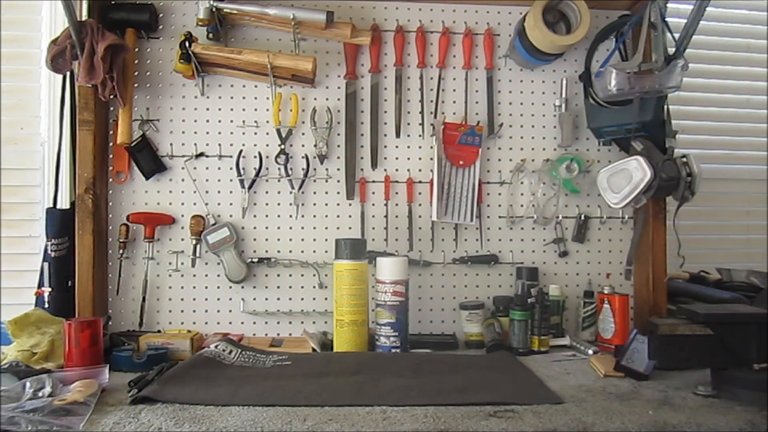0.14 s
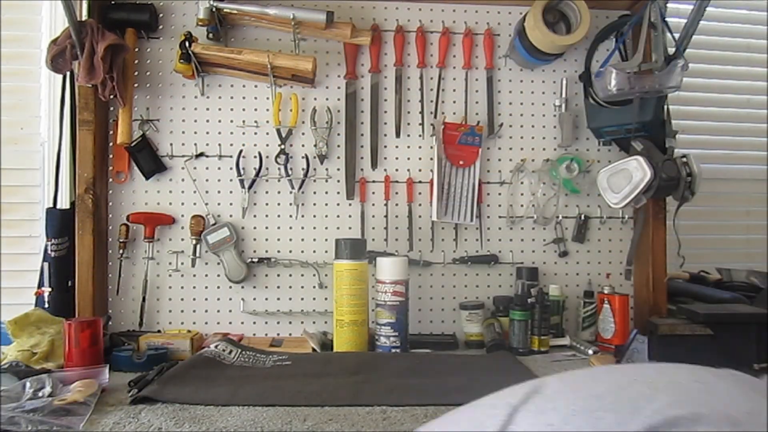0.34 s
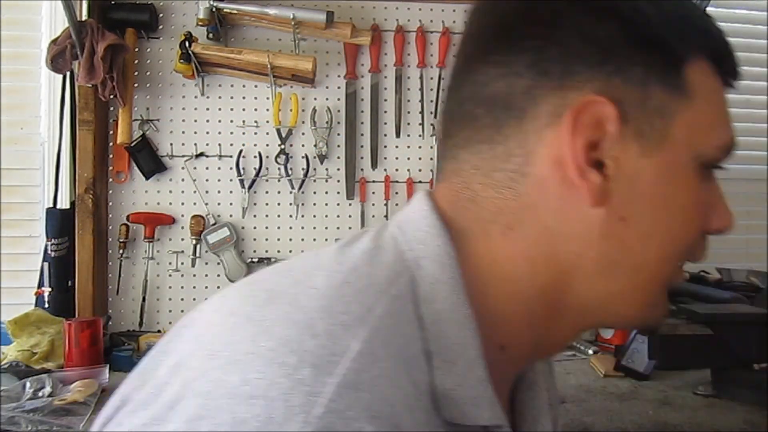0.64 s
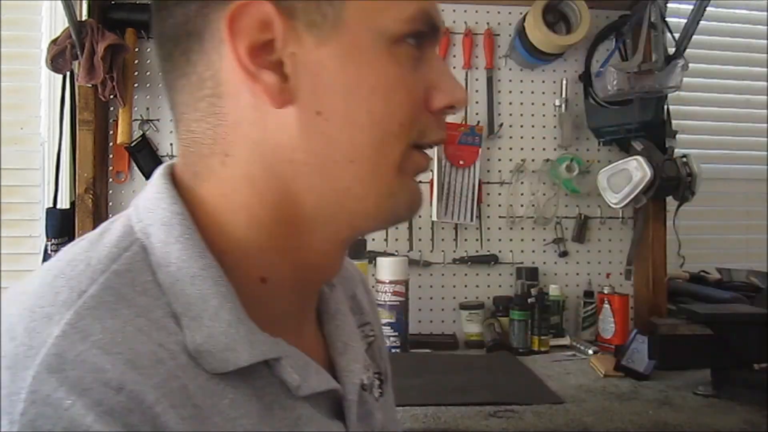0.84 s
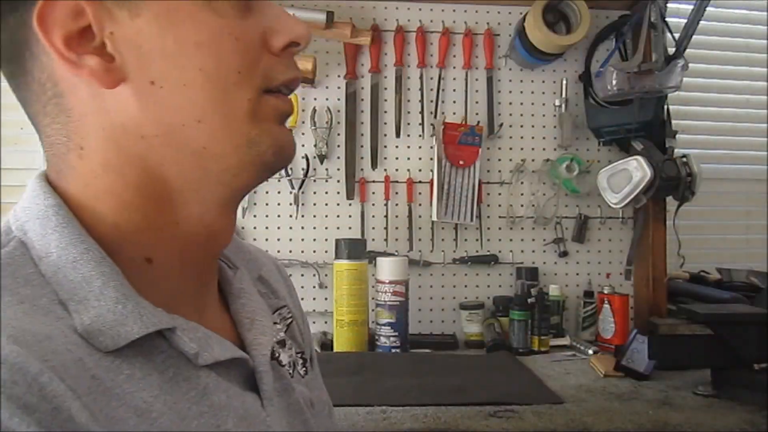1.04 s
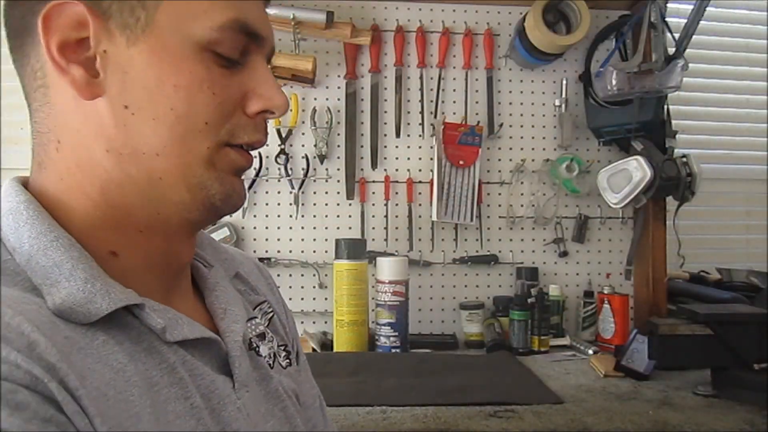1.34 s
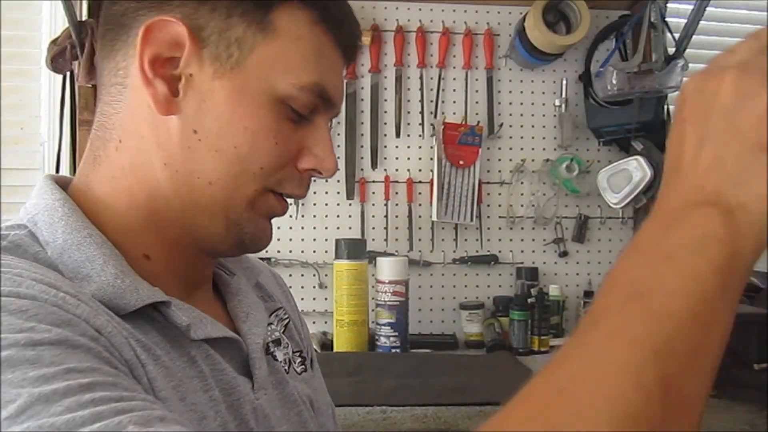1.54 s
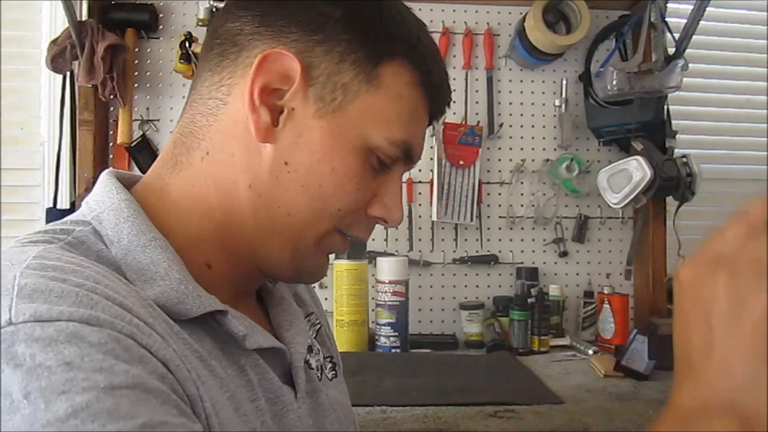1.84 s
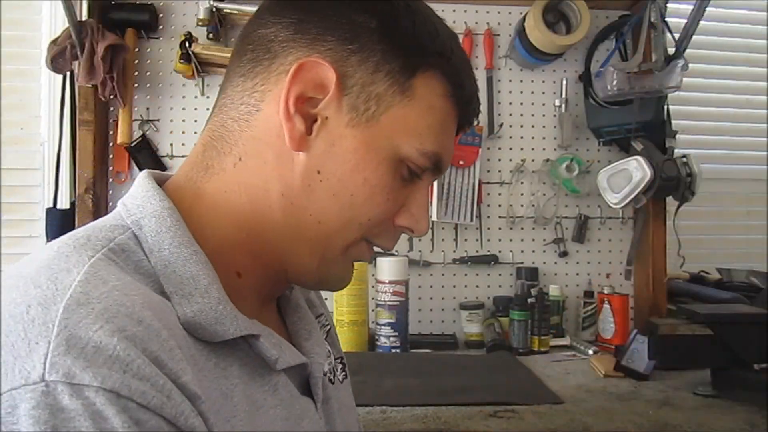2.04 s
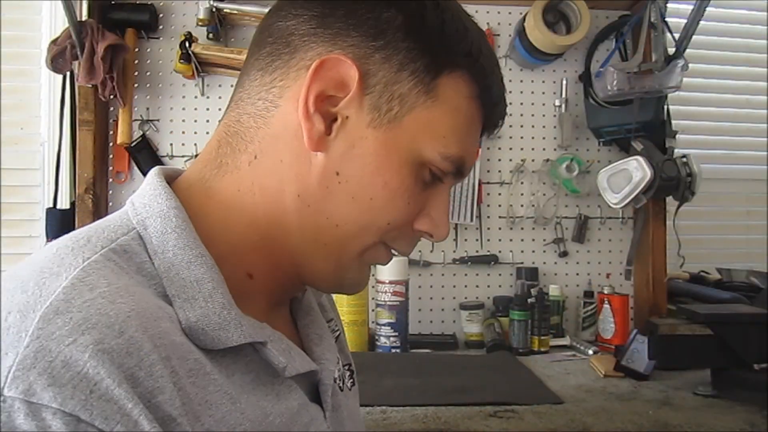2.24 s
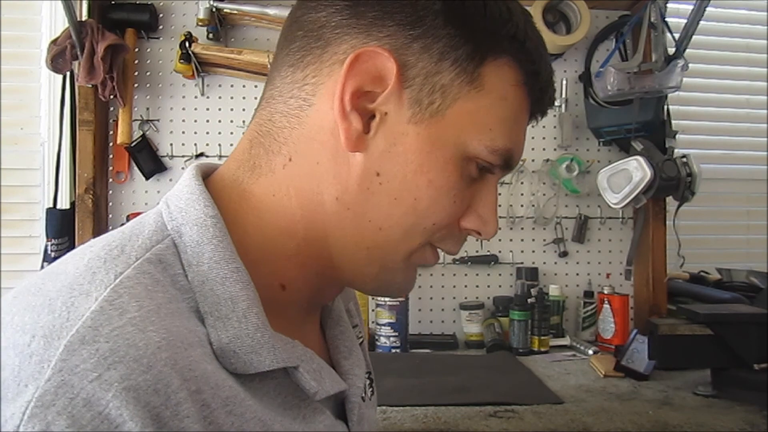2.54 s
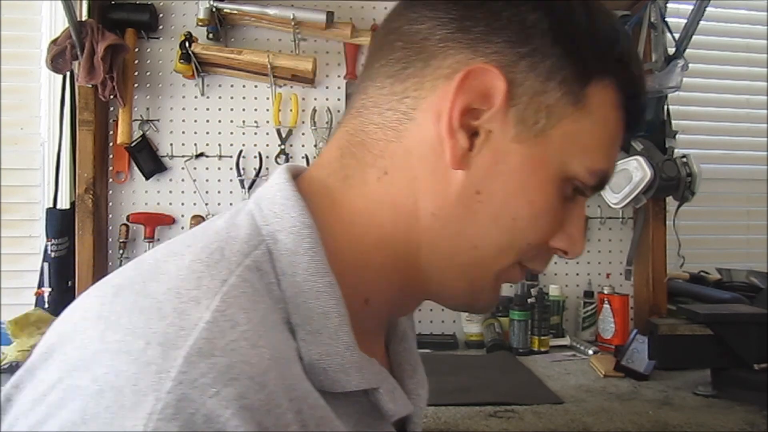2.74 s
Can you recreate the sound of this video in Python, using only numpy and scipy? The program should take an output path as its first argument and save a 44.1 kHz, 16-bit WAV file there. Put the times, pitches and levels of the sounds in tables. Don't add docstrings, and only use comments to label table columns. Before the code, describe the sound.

In a small workshop, quiet steps, rustles and light metallic touches come first; then a dropped steel bar cracks sharply on the concrete floor nearby and rings brightly, wavering and fading, as the background noise dips.

```python
import sys
import numpy as np
from scipy import signal
from scipy.io import wavfile
from scipy.ndimage import uniform_filter1d

SR = 44100
rng = np.random.default_rng(int(sys.argv[2]) if len(sys.argv) > 2 else 0)


def volts(x):
    e = np.asarray(x, float) / 20
    return 10 ** e


def log_audio(samples):
    frames = np.atleast_2d(samples).T
    limited = np.clip(frames, -1, 1)
    pcm = np.round(limited * 32767).astype(np.int16)
    wavfile.write(sys.argv[1], SR, pcm)


N = 127890
T = np.arange(N) / SR
DROP_S, LAND_S = 2.219, 2.919


def noise():
    return rng.standard_normal(N)


def unit(x):
    return x / np.sqrt(np.mean(x ** 2))


def band(x, hz, width):
    return signal.lfilter(*signal.iirpeak(min(hz, .45 * SR), max(hz / width, .3), fs=SR), x)


def noise_band(source, hz, width, second_width):
    return unit(band(band(source, hz, width), hz, second_width))


def sine(hz, start):
    return np.sin(2 * np.pi * hz * (T - start))


def fade(start, t60, rise):
    u = np.clip(T - start, 0, None)
    return (1 - np.exp(-u / rise)) * volts(-60 * u / t60)


def walk(rate):
    k = int(SR / rate)
    return unit(uniform_filter1d(uniform_filter1d(noise(), k), k))


# (frequency [Hz], density [dB per Hz])
RUMBLE = [(18, -35), (30, -5), (229, -3), (319, -7), (1580, -17), (2080, -21), (3200, -21), (4160, -50),
          (7040, -120)]


def rumble():
    out = 0
    curve_hz, curve_db = np.array(RUMBLE).T
    for hz in 30 * 2 ** np.arange(0, 7, .5):
        density_db = np.interp(np.log(hz), np.log(curve_hz), curve_db)
        db = density_db + 10 * np.log10(hz) + 0.27 * walk(6)
        out = out + volts(db) * noise_band(noise(), hz, hz / 2, hz / 2)
    return volts(-55.5) * unit(out)


# (frequency [Hz], level [dB])
HUM = [(58, -63), (114, -65.5), (174, -69.5), (228, -67.5)]


def hum():
    return sum(volts(db + 2.5 * walk(5)) * sine(hz, 0) for hz, db in HUM)


# (frequency [Hz], width [Hz], level [dB])
INSECTS = [(3870, 50, -5), (4170, 120, -10.5), (4180, 91, 0.5), (4670, 450, -6), (4450, 74, -7),
           (4530, 160, -1.5), (4806, 60, 2), (5180, 200, -8), (4400, 1200, 5.5)]
# (multiple [1], level [dB])
OVERTONES = [(1, -0.5), (2, -5.5), (3, -10.5)]


def insects():
    chorus = 0
    for hz, width, db in INSECTS:
        for k, k_db in OVERTONES:
            song = noise_band(noise(), k * hz, k ** .5 * width, 2 * k * width)
            chorus = chorus + volts(db + k_db) * song
    swell_db_s = 1
    return unit(chorus) * volts(-51 + swell_db_s * (T - DROP_S) + .6 * walk(13))


def background():
    high = insects() + volts(-74.5) * noise()
    lowpass = signal.butter(8, 13670, fs=SR, output="sos")
    dulled = signal.sosfilt(lowpass, high) + volts(-21.5) * high
    return rumble() + hum() + dulled


# (start [s], length [s], level [dB], centre [Hz], width [Hz])
SCUFFS = [(0.11, 0.092, -60, 1430, 2000), (.28, 0.15, -63, 2060, 1500), (0.377, 0.1, -62.5, 450, 60),
          (.455, 0.066, -57, 430, 59), (0.556, 0.23, -58.5, 655, 700), (.78, 0.27, -60, 775, 120),
          (0.778, 0.3, -56, 740, 600), (0.428, 0.39, -71.5, 1173, 90), (0.78, 0.4, -63.5, 2160, 600),
          (1.01, 0.23, -64, 750, 150), (0.966, 0.13, -57.5, 5700, 9000), (1.496, 0.096, -58.5, 900, 1200),
          (2.153, 0.13, -51, 701, 48.4)]


def scuffs():
    out = 0
    for s, length, db, hz, width in SCUFFS:
        shape = np.sin(np.pi * np.clip((T - s) / length, 0, 1) ** 0.49)
        grains = noise() * volts(2.89 * walk(150))
        out = out + volts(db) * shape * noise_band(grains, hz, width, 2 * width)
    return out


# (time [s], level [dB], pitch [Hz], t60 [s])
KNOCKS = [
    (.102, -44.5, 655, 0.052),
    (.539, -44, 424, 0.14),
    (.540, -44, 218, 0.13),
    (.573, -43, 273, .1),
    (.741, -41.5, 576, 0.086),
    (.78, -47.5, 1010, .05),
    (.781, -49, 482, 0.09),
    (1.522, -42.5, 495, 0.043),
]


def knocks():
    out = 0
    for s, db, hz, t60 in KNOCKS:
        skin = unit(band(noise(), 1.31 * hz, 0.34 * hz))
        out = out + volts(db) * fade(s, t60, 0.0019) * (sine(hz, s) + 0.32 * skin)
        click = unit(band(band(noise(), 1.44 * hz, 0.91 * hz), 1.4 * hz, 2.5 * hz))
        out = out + volts(db - 2.5) * fade(s, .01, 0.00042) * click
    return out


# (time [s], level [dB], brightness of upper modes [dB], t60 [s])
TOUCHES = [
    (.102, -51.5, -9, 0.6),
    (.13, -58, 1.5, 0.34),
    (.297, -52.5, -8, 0.17),
    (.324, -52, 2, 0.19),
    (.345, -53.5, -5, 0.44),
    (.368, -57.5, 10.5, 0.33),
    (.42, -59, 6, 0.23),
    (1.522, -52.5, -8, 0.31),
]


def touches():
    out = 0
    for s, db, bright_db, t60 in TOUCHES:
        for k, (hz, *_) in enumerate(BAR[:3]):
            beat = 1 + 0.6 * np.sin(2 * np.pi * 23 * (T - s) + k)
            mode_db = db + bright_db * min(k, 1) - 10.5 * (k > 1)
            out = out + volts(mode_db) * beat * fade(s, t60, 0.0045) * sine(hz, s)
    return out


# (frequency [Hz], width [Hz], level [dB], t60 [s])
ROOM = [(150, 120, -56.5, .3), (400, 640, -40, 0.47), (1030, 580, -38, 0.37), (2266, 1500, -35, .4),
        (4000, 2400, -26.5, 0.48), (6300, 2000, -41.5, .4), (9300, 1500, -47, .3), (12500, 2500, -50, .12),
        (15200, 1000, -48, .4)]


def room_tail():
    out = 0
    for hz, width, db, t60 in ROOM:
        tail = noise_band(noise(), hz, width, 1.3 * width)
        out = out + volts(db) * tail * fade(DROP_S, t60, 0.0026)
    return out


# (frequency [Hz], level [dB], t60 [s])
SLAB = [(150, -37, .05), (430, -3, 0.013), (492.5, -4, 0.076), (611, 0.5, 0.025), (661, -4.5, .05),
        (945, -6.5, .05), (1112, -4.5, 0.079)]


def slab_thuds():
    out = 0
    for s, _, _, thud_db in BLOWS:
        for hz, db, t60 in SLAB:
            out = out + volts(thud_db + db - 7.5) * fade(s, t60, 0.00031) * sine(hz, s)
    return out


# (time [s], crack level [dB], brightness [dB per 10 kHz], thud level [dB])
BLOWS = [
    (2.2168, -36, -30, -18),
    (2.2186, -5.5, 1, -12),
    (2.2235, -9, -6.5, -13.5),
    (2.2262, -9, -11, -28),
    (2.2306, -10, 1.5, -24),
    (2.2377, -21.5, -7.5, -48.5),
]
# (frequency [Hz], width [Hz], level [dB])
CRACK = [(2097, 166, 8), (3640, 500, 4), (4100, 340, 0), (5100, 700, -10), (6500, 300, -29),
         (9200, 2200, -20.5), (15600, 1430, -20)]


def cracks():
    grit, out = noise(), 0
    snaps = [fade(s, 0.0059, .0001) for s, *_ in BLOWS]
    for hz, width, db in CRACK:
        burst = 0
        for snap, (_, crack_db, bright_db, _) in zip(snaps, BLOWS):
            burst = burst + volts(crack_db + bright_db * hz / 10000) * snap
        out = out + volts(db + 9.5) * band(burst * grit, hz, width)
    return out


# (time [s], frequency [Hz], level [dB], t60 [s], sag [Hz/s])
CLANG = [
    (2.2315, 5545, -13, 0.23, 200),
    (2.2195, 9975, -23, 0.86, 250),
    (2.219, 2165, -19.5, 0.11, 60),
]


def clang():
    out = 0
    for s, hz, db, t60, sag in CLANG:
        out = out + volts(db) * fade(s, t60, 0.0018) * sine(hz - sag * (T - s) / 2, s)
    return out


# (frequency [Hz], level [dB], t60 [s], tumble phase [rad], build-up [s])
BAR = [(2116.084, 0, 4.029, -2.41, .13), (5486.885, 1.5, 1.28, -.909, .012),
       (9889.763, -1.5, .92, -1.634, .008), (10700, -36, 2.5, .5, .03), (14860, -30, .6, .8, .005),
       (15720, -30, .5, .3, .005)]
# (cosine to the vertical [1], delay [s], low mode [dB], middle mode [dB], upper modes [dB])
PATHS = [(-.845, .01147, -33.8, -21, -30.1), (.9, .02, -50, -27, -33), (.123, .03432, -24, -31.9, -30.3),
         (.466, .04287, -41.7, -34.9, -34), (.678, .04559, -34.4, -28.1, -35),
         (-.304, .05664, -24.3, -19.9, -24.5), (.129, .05773, -24.4, -23.8, -28.1),
         (-.282, .06827, -24, -21.4, -24.7), (-.967, .06859, -42, -25, -33)]


def flight():
    spin_hz, null_share, turn_rad = 2.3, 1., 3.
    out, first = np.zeros(N), int(DROP_S * SR)
    cosine, delay, *path_db = np.array(PATHS).T[:, :, None]
    u = np.clip(T[first:] - DROP_S - delay, 0, None)
    height = 9.81 / 2 * u * (LAND_S - DROP_S - u)
    doppler_time = u + cosine * height / 343
    for k, (hz, db, t60, phase, rise) in enumerate(BAR):
        facing = null_share + np.sin(2 * np.pi * spin_hz * u + phase + turn_rad * cosine)
        tone = np.sin(2 * np.pi * hz * doppler_time)
        build_up = 1 - np.exp(-(u / rise) ** 2)
        level = volts(db + path_db[min(k, 2)] - 60 * u / t60) * build_up
        out[first:] += (level * facing * tone).sum(axis=0)
    return out


def gain_control():
    creep_db_s, duck_db, duck_s, recover_db_s = 3.5, -19.5, 0.087, 2.5
    after = np.clip(T - DROP_S, 0, None)
    creep = creep_db_s * np.minimum(T - DROP_S, 0)
    duck = duck_db * (1 - np.exp(-after / duck_s))
    return volts(creep + duck + recover_db_s * after)


def scene():
    near = scuffs() + knocks() + touches()
    blow = room_tail() + slab_thuds() + cracks()
    return (background() * gain_control() + near + blow + clang() + flight())[None]


def low_pass(x):
    return signal.sosfilt(signal.butter(12, 16970, fs=SR, output="sos"), x)


def record(dry):
    ceiling, top_hz = .56, 15800
    soft = dry / (1 + (np.abs(dry) / ceiling) ** 4) ** .25
    lowpass = signal.ellip(8, .2, 70, top_hz, fs=SR, output="sos")
    return low_pass(signal.sosfilt(lowpass, soft))


dry = scene()
out = record(dry)
log_audio(out)
```